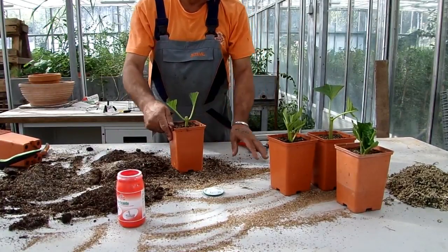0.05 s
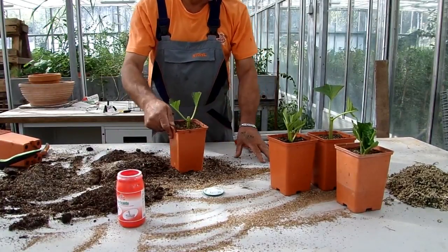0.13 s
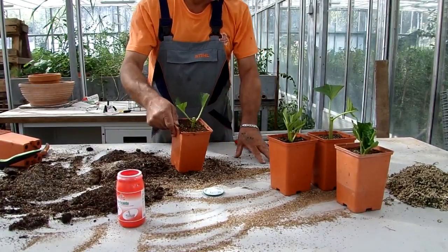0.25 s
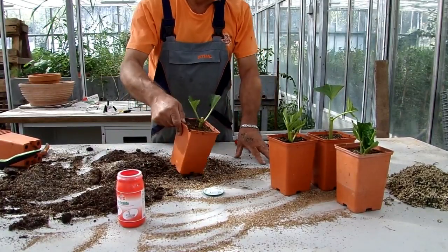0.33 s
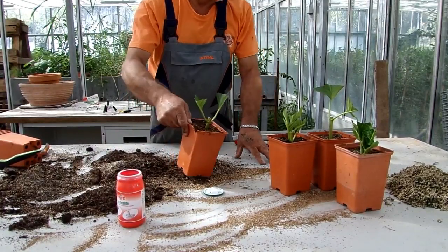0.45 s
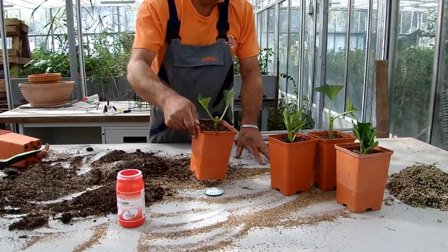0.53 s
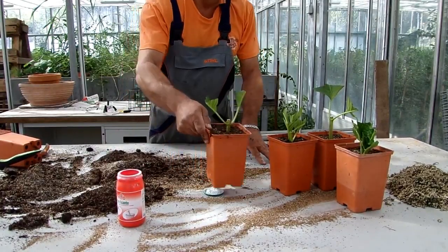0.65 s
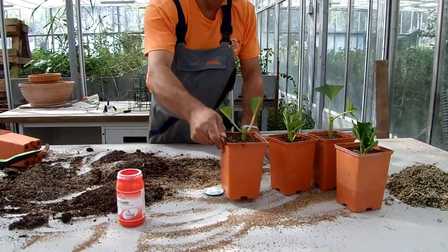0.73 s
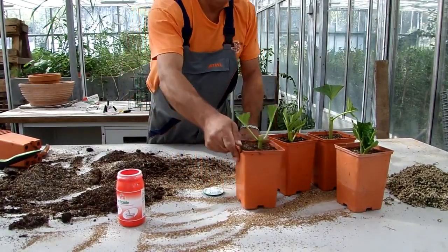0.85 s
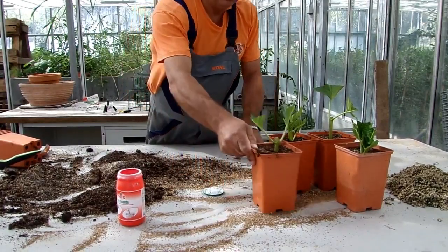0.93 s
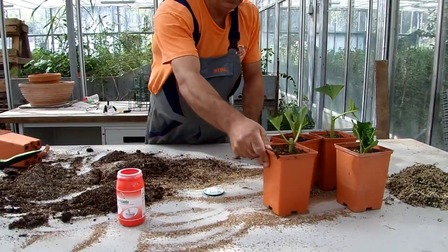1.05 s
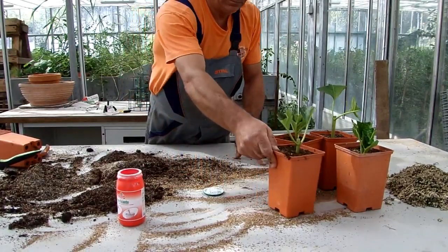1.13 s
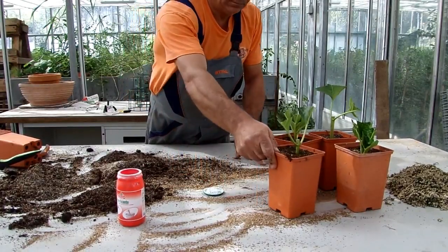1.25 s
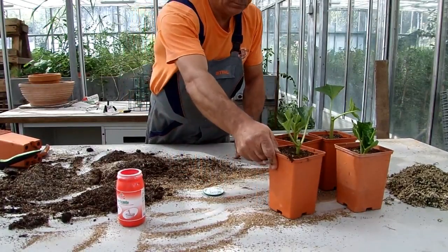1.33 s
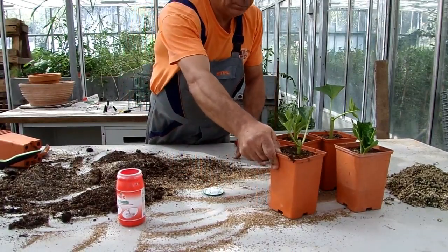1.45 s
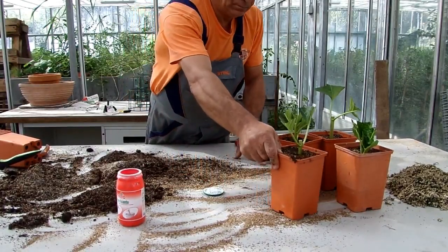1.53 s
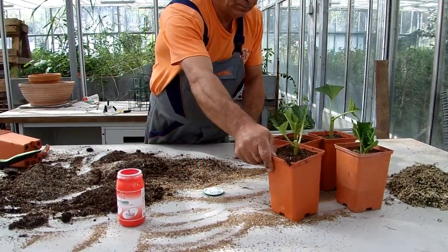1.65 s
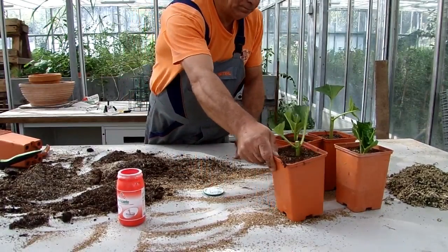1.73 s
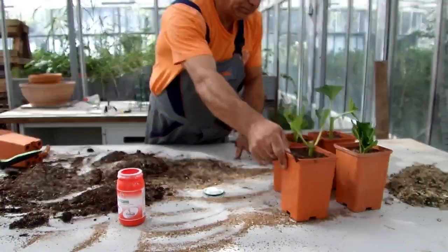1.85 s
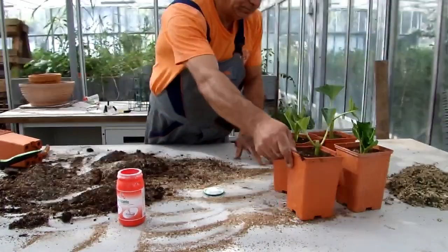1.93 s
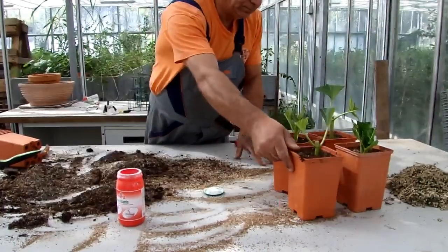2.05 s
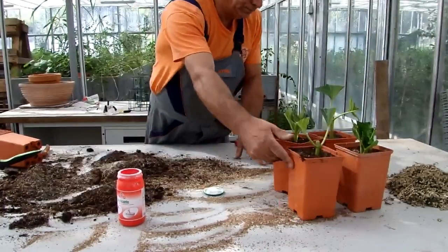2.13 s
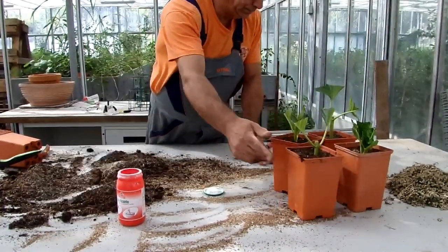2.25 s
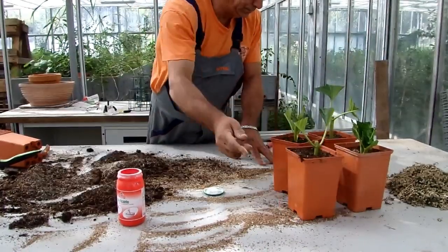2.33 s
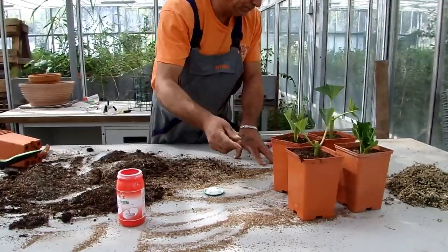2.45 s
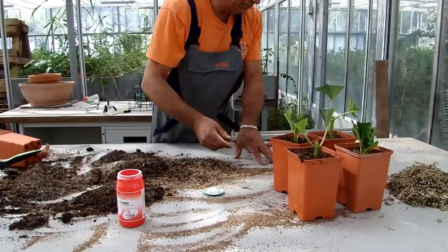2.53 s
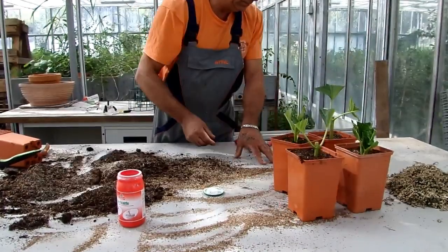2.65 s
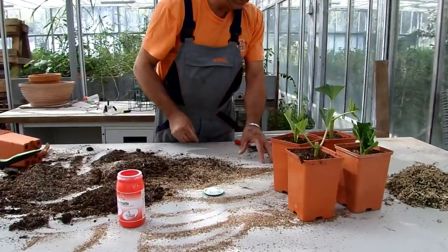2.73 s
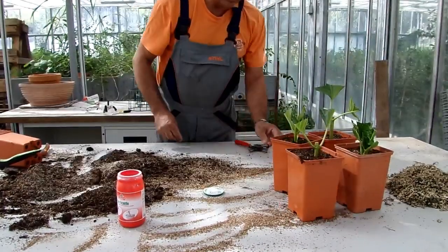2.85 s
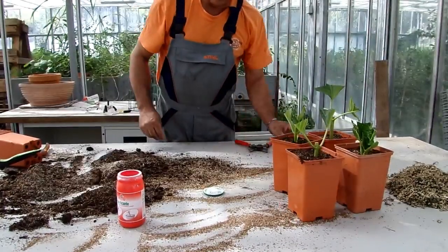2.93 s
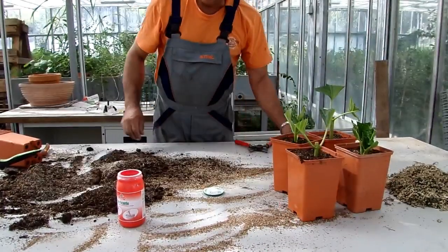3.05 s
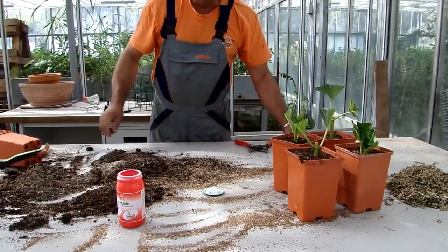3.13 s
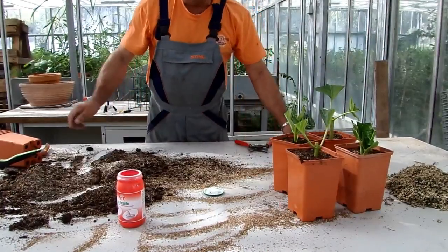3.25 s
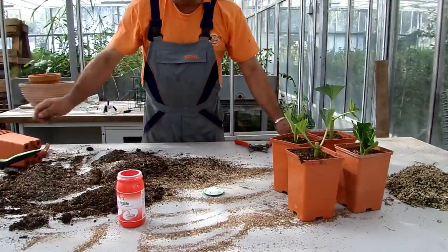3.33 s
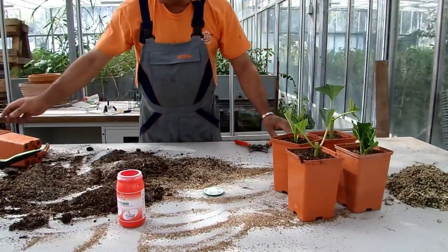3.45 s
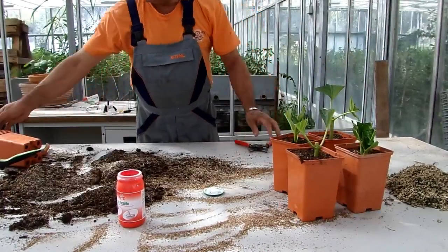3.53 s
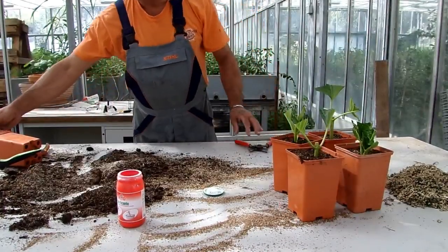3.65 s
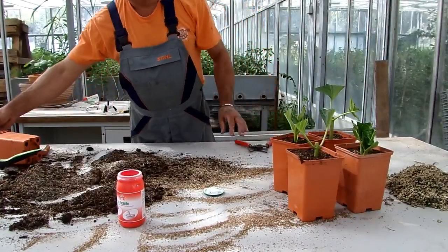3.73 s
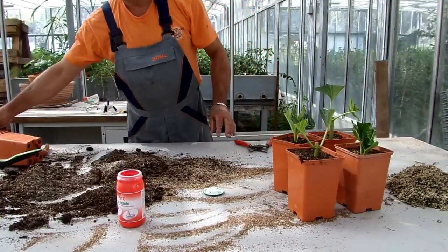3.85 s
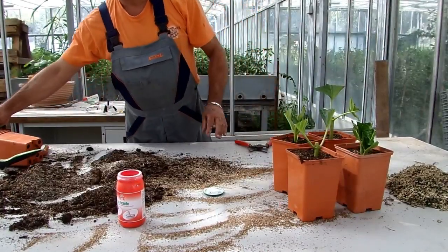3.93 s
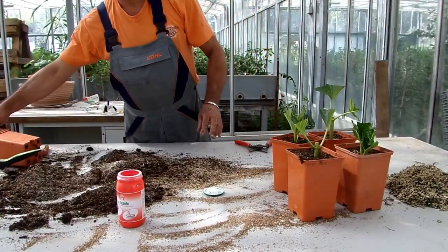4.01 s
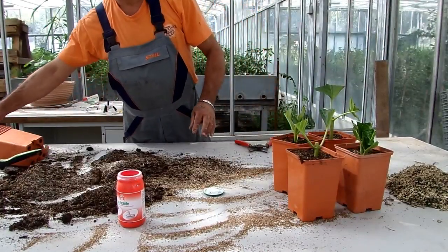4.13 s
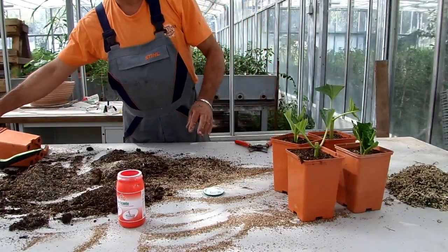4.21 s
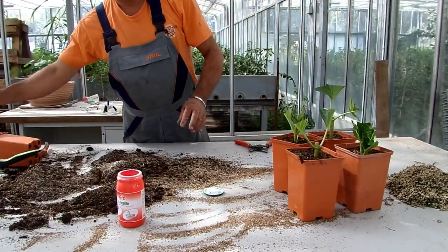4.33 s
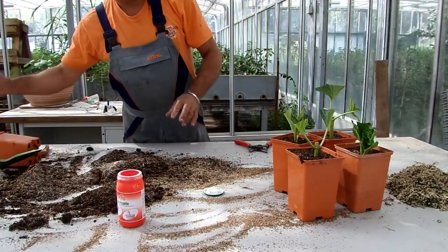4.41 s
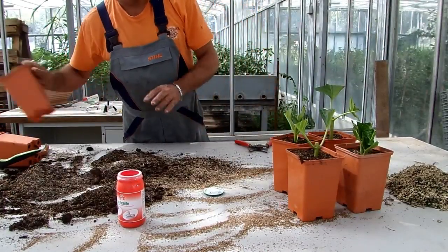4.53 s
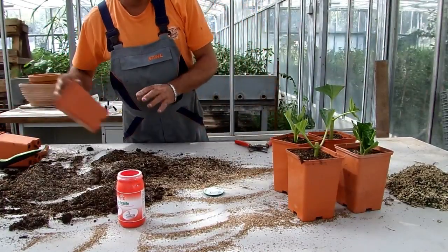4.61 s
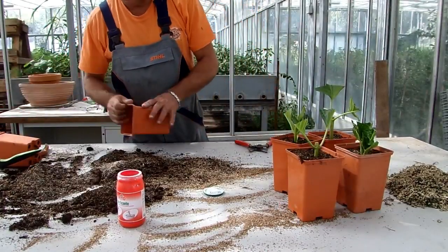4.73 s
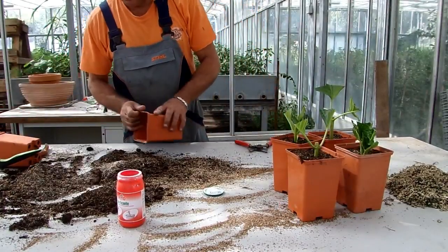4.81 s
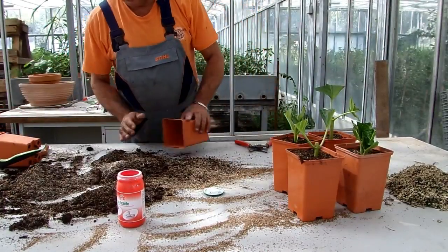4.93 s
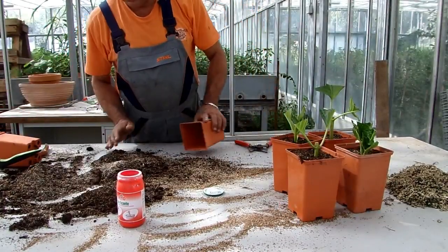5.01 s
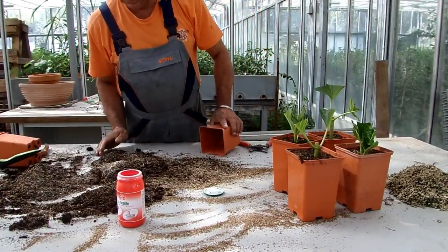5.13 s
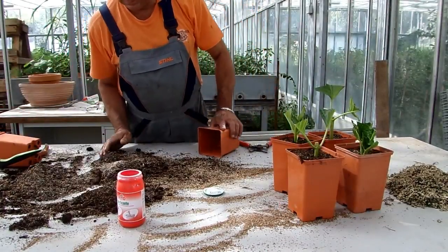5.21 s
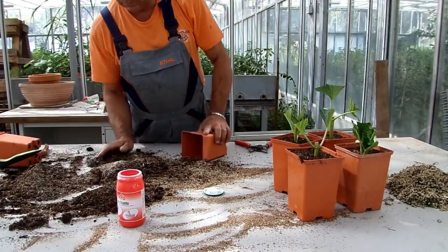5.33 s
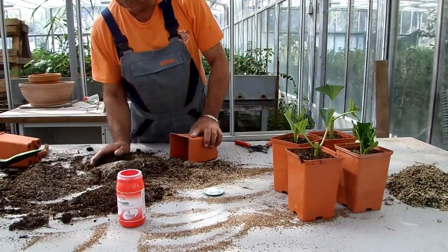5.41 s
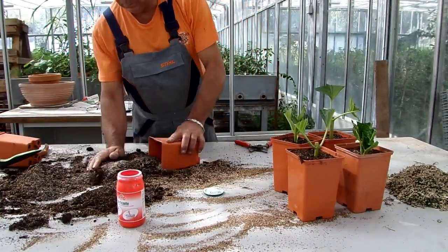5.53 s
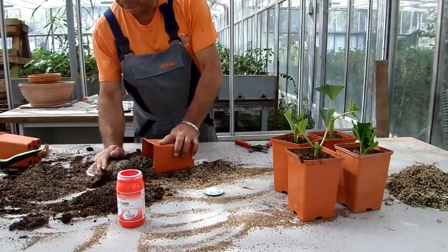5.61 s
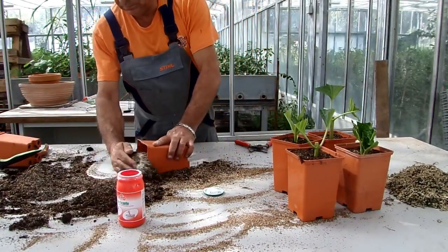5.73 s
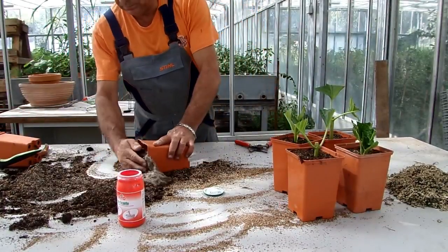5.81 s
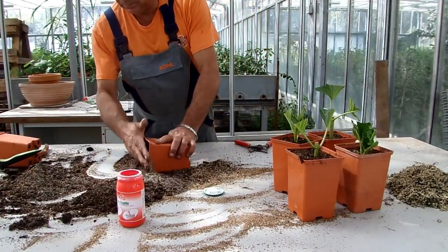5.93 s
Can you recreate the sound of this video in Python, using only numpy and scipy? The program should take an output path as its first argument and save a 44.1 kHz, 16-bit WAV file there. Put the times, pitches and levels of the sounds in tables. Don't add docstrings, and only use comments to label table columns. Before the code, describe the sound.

Close on a gritty potting bench in a glasshouse, a full plastic pot lands with a sharp knock and crunchy scrape, then is nudged into place. Knuckles tap the bench, an empty pot drags and bumps from its stack, and a hand sweeps crackling soil into it. Faint outdoor hum, short glassy echo, small microphone.

```python
import sys
import numpy as np
from scipy import signal
from scipy.fft import rfft, irfft, next_fast_len
from scipy.io import wavfile

SR = 44100
rng = np.random.default_rng(int(sys.argv[2]) if len(sys.argv) > 2 else 0)


def wrap_up_sound(samples):
    columns = np.atleast_2d(samples).T
    tamed = np.clip(columns, -1, 1)
    steps = np.round(tamed * 32767).astype(np.int16)
    wavfile.write(sys.argv[1], SR, steps)


def undo_db(level):
    steps = np.asarray(level, float) / 20
    return 10 ** steps


N = 263277

# hz, level_db, t60_s
BENCH_MODES = [(131, -8.5, 0.14), (186.8, -3.5, 0.18), (260, 2, 0.085), (318.3, 2, 0.15), (401, 0.5, 0.049)]
POT_MODES = [(430, -17, 0.093), (519, -3, 0.032), (660, -6, 0.054), (754, -4, 0.039), (876, 2.5, 0.015),
             (1095, 0.5, 0.0098), (1421, 3, 0.02), (1774, 4.5, 0.018), (1850, 3.5, 0.013),
             (2240, 1.5, 0.012), (2880, -11, 0.033), (3050, -5, 0.021)]
EMPTY_POT_MODES = [(400, -5.5, 0.049), (520, -17, 0.026), (632, -1.5, 0.025), (830, -3, 0.02),
                   (1020, -2, 0.023), (1514, 4.5, 0.0067), (1830, -19, 0.015), (2250, -10, 0.011),
                   (2850, -26, 0.02)]
BENCH_TOP_MODES = [(184, -5.5, 0.2), (394, -10, 0.05), (461.5, -2, 0.14), (614, -1, 0.059),
                   (860, 9.5, 0.012), (1076, -4, 0.074), (1130, -1.5, 0.021), (1450, 8, 0.018),
                   (1700, 1.5, 0.014), (2300, -4, 0.014), (2800, -28, 0.021)]
STACK_MODES = [(253, 1.5, 0.09), (319, -0.5, 0.037), (367, -1, 0.044), (452, 0.5, 0.055), (580, -5, 0.033),
               (620, -3, 0.037), (915, -7, 0.011), (1500, -5, 0.012)]

# hz, level_db_per_hz
GRIT_SPECTRUM = [(1200, -11), (2000, 8), (3000, 11.5), (4500, 10), (6500, 5.5), (8000, -12.5), (10000, 8),
                 (12500, -8), (16000, -10)]
CRACK_SPECTRUM = [(1500, -5.5), (2500, 5.5), (5000, 6.5), (8000, -3.5), (10500, 4), (13000, -12),
                  (16000, -12)]
AIR_SPECTRUM = [(34, 0), (58, -1.5), (201, 6), (436, 0), (880, 1), (1250, 0), (1440, -2.5), (2200, -9.5),
                (3200, -55), (3600, -23), (5610, -13), (7980, -40), (9630, -20), (15800, -17.5)]

DIP_HZ = [1270, 1620, 3639, 4457, 7257, 8075, 10150, 11714, 14700]
# width_hz, depth_db
DIP_SHAPES = [(194, -7), (150, -2), (340, -39), (256, -34), (400, -32), (700, -42), (520, -10.5),
              (396, -26), (600, -30)]

# time_s, grit_db (rubbing speed), rumble_db (weight on bench)
PLACING = [
    (0.0, -58, -60),
    (0.23, -48, -70),
    (0.5, -61.5, -61),
    (0.8, -58, -57),
    (0.98, -33.5, -47),
    (1.02, -45.5, -48.5),
    (1.49, -54.5, -54.5),
    (2.01, -59, -57),
    (2.16, -61, -55),
]
FETCHING = [
    (2.79, -58, -58),
    (3.0, -58, -48.5),
    (3.44, -62.5, -54),
    (3.7, -59.5, -62),
    (3.82, -55.5, -51),
    (4.1, -48, -51),
    (4.33, -51.5, -37),
    (4.639, -58, -52.5),
    (5.14, -54.5, -62),
]
SWEEPING = [
    (5.2, -37, -55),
    (5.25, -32, -58),
    (5.319, -27.5, -44),
    (5.375, -30, -112),
    (5.41, -26.5, -69),
    (5.5, -33.5, -63),
    (5.59, -39, -41),
    (5.8, -41.5, -48.5),
    (5.97, -47, -52.5),
]

# start_s, level_db, pitch_hz, pitch_db, length_s
POT_SLIDES = [(0.06, -43, 3220, -28, 0.02), (0.095, -45.5, 4900, -13, 0.079), (.195, -39, 2300, 25, 0.02),
              (0.645, -45, 3820, -2, 0.1), (0.826, -43, 10000, 14, 0.22), (0.939, -20, 10000, 14, 0.051),
              (0.943, -28, 6060, 18, 0.035), (1.18, -39.5, 9300, 13, 0.026), (1.885, -43, 4160, -11, 0.075),
              (1.56, -55, 10000, 7, 0.15), (2.65, -53, 10700, 1, 0.24), (3.077, -50, 2800, -3, 0.027),
              (3.126, -42, 3060, -1, 0.066), (3.183, -40.5, 4870, -9, 0.052), (3.2, -51, 2300, -1, 0.12)]
# start_s, level_db, pitch_hz, pitch_db, length_s
STACK_PULLS = [(3.677, -44.5, 3020, -12, 0.089), (3.815, -41, 5000, -31, 0.042),
               (3.937, -40, 6460, -4, 0.052), (4.045, -36.5, 2680, -17, 0.13),
               (4.065, -39.5, 700, 25, 0.18), (3.94, -39, 740, 10, 0.036), (4.1, -40, 4000, -7, 0.14),
               (4.172, -33, 6100, -5, 0.047), (4.21, -44, 925, -1, 0.06), (4.7, -44.5, 3100, -7, 0.057),
               (4.73, -41.5, 10000, 6, 0.072), (4.86, -48.5, 4050, -24, 0.097)]
# start_s, level_db, pitch_hz, pitch_db, length_s
SKIDS = [
    (0.886, -18.5, 10500, 12, 0.039),
    (1.214, -30, 6150, -22, 0.0086),
    (1.86, -45, 10000, 3, 0.15),
    (2.11, -56.5, 10500, 8, 0.073),
    (3.747, -31, 3230, -7, 0.026),
    (3.76, -32.5, 3060, 6, 0.019),
    (3.806, -36, 2600, -13, 0.017),
    (5.654, -21, 3110, 5, 0.031),
    (5.686, -19.5, 3000, 7, 0.013),
]
# start_s, level_db, pitch_hz, pitch_db, length_s
HAND_PUSHES = [
    (5.199, -27, 5200, -30, 0.024),
    (5.226, -25.5, 2560, 6, 0.036),
    (5.272, -19, 4300, -13, 0.044),
    (5.29, -19, 10500, 9, 0.03),
    (5.34, -16, 9060, 4, 0.04),
    (5.368, -10, 4160, -26, 0.019),
    (5.62, -35, 3200, -5, 0.03),
    (5.655, -26, 4950, 7, 0.06),
    (5.714, -30, 2900, -20, 0.035),
]

# start_s, peak_db, thud_db (re peak), wall_hz, crunch_s
POT_KNOCKS = [(0.205, -33, -15.5, 1370, 0.036), (0.237, -34, -9, 550, 0.0086),
              (0.272, -29, -23, 530, 0.036), (0.808, -5.5, -30, 514, 0.01), (0.8105, -13, -50, 1650, 0.005),
              (0.82, -14, -54, 555, 0.016), (0.878, -8, -60, 600, 0.01), (0.8845, -7, -50, 1500, 0.0031),
              (0.892, -7, -55, 520, 0.014), (1.215, -11.5, -36, 502, 0.028),
              (1.2195, -10.5, -33, 1500, 0.009), (1.231, -19, -46, 520, 0.033),
              (1.2455, -10.5, -31, 1580, 0.0074), (1.255, -17.5, -24, 510, 0.012),
              (1.506, -34.5, -10, 700, 0.052), (1.548, -20, -30, 1130, 0.0079),
              (1.82, -16.5, -18.5, 1630, 0.037), (1.835, -22.5, -49, 538, 0.005),
              (2.114, -36, -38, 1900, 0.0085), (3.181, -24.5, -22, 2140, 0.056)]
# start_s, peak_db, thud_db (re peak), own_hz, crunch_s
KNUCKLE_TAPS = [
    (2.778, -17.5, -16, 700, 0.017),
    (2.94, -20.5, -14, 522, 0.0099),
    (3.396, -40.5, -14, 460, 0.0027),
    (3.723, -14.5, -23, 1550, 0.012),
    (3.727, -21, -15, 2150, 0.023),
    (5.088, -23.5, -16, 563, 0.019),
]
# start_s, peak_db, thud_db (re peak), wall_hz, crunch_s
STACK_BUMPS = [(3.832, -28, -24, 452, 0.0058), (3.847, -23, -20, 400, 0.027), (3.868, -36, -30, 330, 0.012),
               (3.95, -32, -30, 600, 0.015), (4.062, -26, -23, 700, 0.016), (4.116, -26, -28, 650, 0.012),
               (4.145, -25.5, -30, 790, 0.01), (4.21, -24.5, -33, 435, 0.023),
               (4.246, -31.5, -28, 400, 0.0075), (4.299, -18.5, -29, 476, 0.013),
               (4.317, -15.5, -20, 281, 0.0055), (4.342, -27, -28, 317, 0.0062),
               (4.358, -25, -24, 297, 0.014), (4.373, -25.5, -30, 400, 0.0032),
               (4.397, -27, -23, 330, 0.01), (4.413, -22, -16, 1400, 0.0061),
               (4.42, -17.5, -28, 417, 0.012), (4.446, -24.5, -23, 332, 0.011),
               (4.478, -28, -15, 280, 0.013), (4.545, -36.5, -10, 400, 0.0085)]
# start_s, peak_db, thud_db (re peak), wall_hz, crunch_s
CLOD_FALLS = [
    (5.243, -14, -39, 1500, 0.022),
    (5.289, -18.5, -16, 646, 0.045),
    (5.304, -18, -35, 630, 0.018),
    (5.33, -18, -46, 620, 0.0091),
    (5.388, -21, -35, 600, 0.012),
    (5.411, -17, -37, 632, 0.062),
    (5.424, -25, -44, 632, 0.053),
    (5.445, -16.5, -14, 616, 0.018),
    (5.53, -27, -50, 640, 0.019),
    (5.553, -17.5, -48, 640, 0.043),
]

# start_s, peak_db, pitch_hz, pitch_db
POT_CRUNCHES = [(0.272, -8.5, 3310, -4.5), (0.3586, -24.5, 3580, -5), (0.8812, 2, 10500, 16),
                (0.9044, -5, 11000, 10), (0.9804, -6, 10500, 18), (1.1544, -26, 2970, -13),
                (1.459, -24, 10400, 4), (1.515, -22, 2200, -7), (1.549, -12, 3370, -6),
                (1.8213, -14.5, 10000, 13), (1.834, -11.5, 5000, -27), (1.8536, -16, 3140, -2),
                (2.645, -31.5, 9750, -3), (2.946, -23, 5260, 10), (2.9676, -24, 10300, 5),
                (3.098, -25.5, 10200, 3), (4.244, -17.5, 9800, -1), (4.313, -16.5, 5100, 6.5),
                (4.4536, -21.5, 2700, 0), (4.565, -35.5, 2700, 9), (4.39, -30, 2360, 6)]
# start_s, peak_db
GRAIN_DROPS = [(0.7507, -44), (1.353, -39), (1.719, -58), (2.2288, -60), (2.385, -43.5), (2.4453, -51),
               (2.4982, -49), (2.579, -56.5), (3.6584, -42), (4.3909, -56), (4.546, -44), (4.7902, -37),
               (4.9247, -39), (5.806, -28)]
# start_s, peak_db, pitch_hz, pitch_db
GRAIN_SNAPS = [(0.8745, -20, 10000, 0), (0.8845, -2, 7000, 1), (0.9447, -15, 6050, 4),
               (1.2447, -6.5, 7000, -14), (1.25, -11, 2040, 2.5), (1.29, -45, 6000, 0),
               (1.316, -49, 6140, 5), (3.6843, -31.5, 3330, -10), (3.7033, -22, 10500, -16),
               (3.7385, -25, 10000, -5), (3.8046, -16.5, 10800, 3), (3.8101, -21, 9900, -7),
               (3.815, -20, 2630, 1), (3.9378, -26, 9500, 13), (4.0645, -20, 9800, 17),
               (4.0745, -12.5, 2750, 0), (4.108, -23, 1410, 10), (4.1306, -16, 1180, 3),
               (4.146, -17.5, 2250, 4), (4.157, -20, 1500, 11), (4.176, -20, 5550, -9),
               (4.195, -18, 1760, 2.5), (4.2404, -15, 5270, 5), (4.3092, -14, 4940, -8),
               (4.6678, -37, 2640, 0), (4.7202, -23.5, 3300, 7), (4.7456, -15.5, 3590, 1.5),
               (4.8165, -31, 9510, -2), (4.8474, -22.5, 9800, -5), (4.861, -30, 9500, 0),
               (4.8958, -26, 2580, -2), (4.905, -29, 2700, 0), (4.938, -30, 6500, 7),
               (5.3735, -21, 2390, 15), (5.4455, 4.5, 10000, 12), (5.5377, -8.5, 9700, 3),
               (5.717, -13.5, 4800, 4), (5.726, -14, 2900, 2), (5.743, -29, 2920, 5)]
# start_s, peak_db, pitch_hz, pitch_db
SWEPT_CRUNCHES = [(5.087, -20, 5200, -9), (5.1644, -25.5, 2880, 15), (5.176, -15.5, 2360, -1),
                  (5.2035, -17.5, 5650, 15), (5.224, -11.5, 2340, -14), (5.254, -11, 3130, -22),
                  (5.277, -19, 2910, -17), (5.3098, -2.5, 6500, -18), (5.3425, -10, 9150, 8),
                  (5.369, -8, 9100, -1), (5.381, -1.5, 4020, 30), (5.3901, -2.5, 4300, 28),
                  (5.402, -2, 3080, 15), (5.4147, -0.5, 2800, -18), (5.421, -2.5, 3030, 26),
                  (5.4283, 1.5, 10800, 5), (5.449, 1.5, 10200, -22), (5.457, 0.5, 10000, 29),
                  (5.4826, -9, 10000, 26), (5.552, -16, 2860, 8), (5.6925, -23, 4740, 0),
                  (5.734, -17.5, 2880, 19), (5.8654, -14, 6100, -3), (5.879, -17.5, 5000, -14)]


def rms_one(x):
    return x / np.sqrt(np.mean(x ** 2) + 1e-20)


def head_one(x):
    return x / np.sqrt(np.mean(x[:900] ** 2))


def butter(x, order, hz, kind):
    return signal.sosfilt(signal.butter(order, hz, kind, fs=SR, output="sos"), x)


def colour(x, spectrum):
    hz = np.maximum(np.fft.rfftfreq(x.shape[-1], 1 / SR), 1)
    points = np.array(spectrum)
    gain = undo_db(np.interp(np.log(hz), np.log(points[:, 0]), points[:, 1], left=-22))
    return rms_one(irfft(rfft(x) * gain, x.shape[-1]))


def drift(rate_hz):
    r = np.exp(-2 * np.pi * rate_hz / SR)
    wander = signal.lfilter([1], [1, -2 * r, r * r], rng.standard_normal(N + SR))
    return rms_one(wander[SR:])


def ring(clicks, hz, t60_s):
    r, w = undo_db(-60 / (t60_s * SR)), 2 * np.pi * hz / SR
    return signal.lfilter([0, np.sin(w)], [1, -2 * r * np.cos(w), r * r], clicks + 1e-18)


def body(clicks, modes, damp=1):
    return sum((-1) ** k * undo_db(db) * ring(clicks, hz, t60_s * damp)
               for k, (hz, db, t60_s) in enumerate(modes))


def grains(shape, per_s, spread_db):
    sizes = undo_db(spread_db * np.minimum(rng.exponential(1, shape), 4))
    signs = rng.choice([-1, 1], shape)
    return sizes * signs * (rng.random(shape) < per_s / SR)


def burst(clicks, length_s, first, rise_s):
    t = np.arange(len(clicks)) / SR
    fading = clicks * (1 - np.exp(-t / rise_s)) * np.exp(-3 * t / np.clip(length_s, .002, .12))
    fading[0] += first
    return np.roll(fading, 64)


def add(out, start_s, x):
    at = round(start_s * SR) - 64
    out[at:at + len(x)] += x[:N - at]


def air():
    level_db = -55 + drift(2.0)
    return undo_db(level_db) * colour(rng.standard_normal(N), AIR_SPECTRUM)


def rubbing():
    time_s, *columns = np.transpose(PLACING + FETCHING + SWEEPING)
    grit_db, rumble_db = [np.interp(np.arange(N) / SR, time_s, c) for c in columns]
    speed_db, weight_db = grit_db + 50, rumble_db + 55
    dust_db = -51 + 1.36 * speed_db
    wall_db = -49 + 0.94 * speed_db + 0.39 * weight_db
    specks_db = dust_db - 24

    clump = undo_db(2.0 * drift(45))
    crushed = grains(N, 9000 * clump, 1.04) * clump ** .5
    pitches_hz = np.geomspace(1300, 15500, 22)
    dealt = rng.integers(0, 22, N)
    rings = sum(ring(crushed * (dealt == k), hz, 3.0 / hz) for k, hz in enumerate(pitches_hz))
    mixed = colour(rings, GRIT_SPECTRUM)
    dust = butter(mixed, 4, 7700, "high")
    grit = butter(mixed, 4, 7700, "low")
    specks = colour(grains(N, 49 * clump, 4.1), CRACK_SPECTRUM)
    wall = body(grains(N, 1500 * clump, 1.0), POT_MODES, damp=0.8)
    shaking = grains(N, 500, 2.45) * undo_db(2.4 * drift(24))
    rumble = body(shaking, BENCH_MODES, damp=0.16)

    levels_db = (grit_db, dust_db, specks_db, wall_db, rumble_db + 1.5)
    layers = (grit, dust, specks, wall, rumble)
    return sum(undo_db(db) * rms_one(layer) for db, layer in zip(levels_db, layers))


def glasshouse(x):
    t60_s, cut_hz = 0.47, 4400
    size = next_fast_len(N + SR)
    turn = np.exp(-2j * np.pi * np.fft.rfftfreq(size))
    dull = np.exp(-2 * np.pi * cut_hz / SR)
    lowpass = (1 - dull) / (1 - dull * turn)
    lags = (rng.uniform(.009, .04, 10) * SR).astype(int)
    echo = 0
    for k, lag in enumerate(lags):
        loop = undo_db(-60 * lag / SR / t60_s) * lowpass * turn ** lag
        echo = echo + (-1) ** k * loop / (1 - loop)
    return irfft(rfft(x, size) * echo, size)[:N]


def slides(table, struck, wall_db, per_s, spread_db, lean, edge):
    out = np.zeros(N)
    clicks = grains((len(table), 10240), per_s, spread_db)
    t = (np.arange(10240) - 64) / SR
    for (start_s, level_db, pitch_hz, pitch_db, length_s), row in zip(table, clicks):
        arch = np.sin(np.pi * np.clip(t / length_s, 0, 1) ** lean).clip(1e-9)
        swell = arch ** edge * (t > 0) * (t < length_s)
        push = row * swell
        pitched = rms_one(ring(push, pitch_hz, 19.6 / pitch_hz))
        grit = rms_one(colour(push, CRACK_SPECTRUM) + undo_db(pitch_db) * pitched)
        wall = rms_one(body(push, struck, damp=0.98))
        sound = grit + undo_db(wall_db - 0.2 * level_db) * wall
        add(out, start_s, undo_db(level_db) * sound * np.sqrt(np.mean(swell ** 2)))
    return out


def knocks(table, struck, crack_db, spread_db, first, rise_s, blunt_db):
    out = np.zeros(N)
    clicks = grains((len(table), 8192), 6000, 0.93)
    luck = rng.normal(0, 1, (len(table), len(struck)))
    for (start_s, peak_db, thud_db, own_hz, crunch_s), row, chance in zip(table, clicks, luck):
        push = burst(row, crunch_s, first, rise_s)
        modes = []
        for (hz, db, t60_s), c in zip(struck, chance):
            octaves_above = max(np.log2(hz / own_hz), 0)
            modes.append((hz, db + spread_db * c - blunt_db * octaves_above, t60_s))
        modes.append((own_hz, 7.5, 22 / own_hz))
        wall = body(signal.lfilter([.4], [1, -.3], push), modes)
        thud = body(signal.lfilter([.1], [1, -.9], push), BENCH_MODES[1:])
        crack = colour(push, CRACK_SPECTRUM)
        hit = undo_db(crack_db) * head_one(crack) + undo_db(thud_db) * head_one(thud)
        add(out, start_s, undo_db(peak_db) * (hit + 0.94 * wall / np.abs(wall).max()))
    return out


def crunches(table, length_s, first, rise_s):
    out = np.zeros(N)
    clicks = grains((len(table), 6144), 12000, 2.5)
    for (start_s, peak_db, pitch_hz, pitch_db), row in zip(table, clicks):
        push = burst(row, length_s, first, rise_s)
        pitched = head_one(ring(push, pitch_hz, 30 / pitch_hz))
        crack = head_one(colour(push, CRACK_SPECTRUM)) + undo_db(pitch_db) * pitched
        wall_db = -29.5 + 0.14 * peak_db
        wall = undo_db(wall_db) * head_one(body(push, POT_MODES, damp=0.41))
        add(out, start_s, undo_db(peak_db) * (0.83 * crack / np.abs(crack).max() + wall))
    return out


def scene():
    bench = rubbing()
    bench += slides(POT_SLIDES, POT_MODES, wall_db=-15.5, per_s=8000, spread_db=4.5, lean=0.4, edge=0.77)
    bench += knocks(POT_KNOCKS, POT_MODES, crack_db=-29.0, spread_db=1.5, first=1.87, rise_s=0.0026,
                    blunt_db=1.5)
    bench += crunches(POT_CRUNCHES, length_s=0.015, first=5.74, rise_s=0.000069)
    drops = [(start_s, peak_db + 6, 10000, 15) for start_s, peak_db in GRAIN_DROPS]
    bench += crunches(drops, length_s=0.0038, first=1.8, rise_s=0.00024)
    bench += crunches(GRAIN_SNAPS, length_s=0.0043, first=1.87, rise_s=0.00023)
    bench += slides(SKIDS, POT_MODES, wall_db=-16, per_s=7200, spread_db=6.0, lean=1.3, edge=0.16)
    bench += knocks(KNUCKLE_TAPS, BENCH_TOP_MODES, crack_db=-34.5, spread_db=2.5, first=2.8, rise_s=0.0016,
                    blunt_db=0.0)
    bench += slides(STACK_PULLS, EMPTY_POT_MODES, wall_db=-17.5, per_s=10000, spread_db=4.5, lean=0.45,
                    edge=0.82)
    bench += knocks(STACK_BUMPS, STACK_MODES, crack_db=-38, spread_db=4.0, first=1.27, rise_s=0.0018,
                    blunt_db=0.5)
    bench += crunches(SWEPT_CRUNCHES, length_s=0.0047, first=0.59, rise_s=0.0018)
    bench += slides(HAND_PUSHES, EMPTY_POT_MODES, wall_db=-38, per_s=9000, spread_db=4.0, lean=0.53,
                    edge=0.66)
    bench += knocks(CLOD_FALLS, EMPTY_POT_MODES, crack_db=-14.0, spread_db=-3.0, first=4.2, rise_s=0.0029,
                    blunt_db=5.5)
    bench = butter(bench, 4, 125, "high")
    return (bench + undo_db(-20) * glasshouse(bench) + air())[None]


def roll_off(x):
    return signal.sosfilt(signal.butter(12, 16500, fs=SR, output="sos"), x)


def record(dry):
    for hz, (width_hz, depth_db) in zip(DIP_HZ, DIP_SHAPES):
        c = -2 * np.cos(2 * np.pi * hz / SR)
        a = np.tan(np.pi * width_hz / SR)
        g = undo_db(depth_db)
        dry = signal.lfilter([1 + a * g, c, 1 - a * g], [1 + a, c, 1 - a], dry)
    overloaded = 1.04 * np.tanh(dry / 1.04)
    band_limit = signal.ellip(14, .5, 45, 15740, fs=SR, output="sos")
    mix = signal.sosfilt(band_limit, overloaded)
    return roll_off(mix)


dry = scene()
out = record(dry)
wrap_up_sound(out)
```